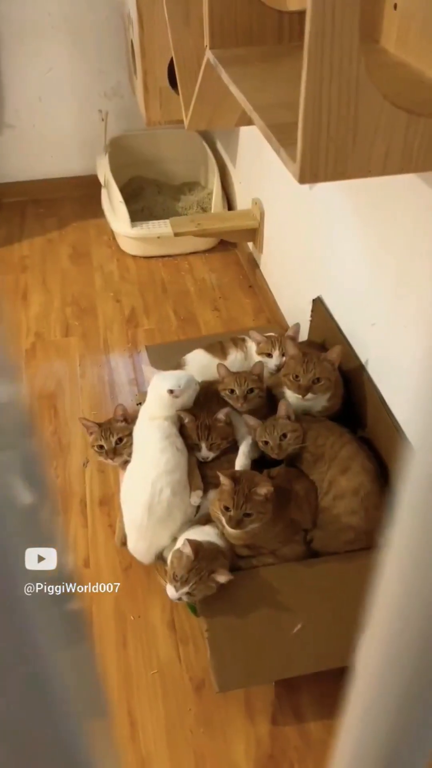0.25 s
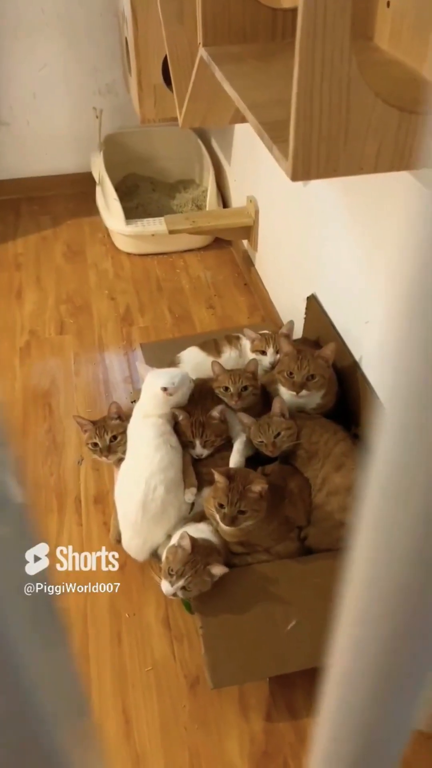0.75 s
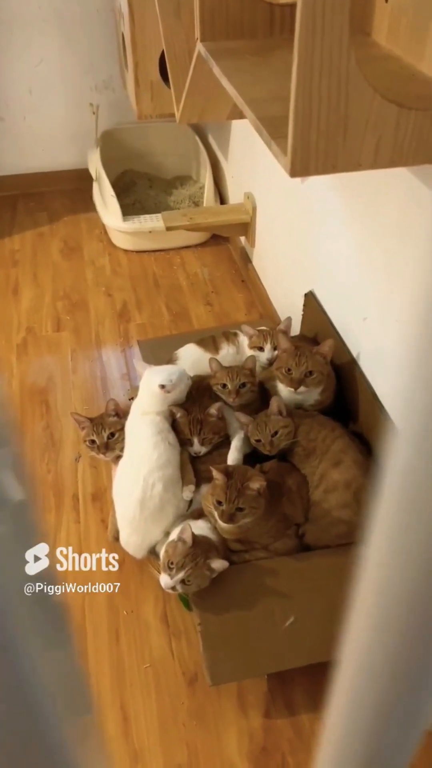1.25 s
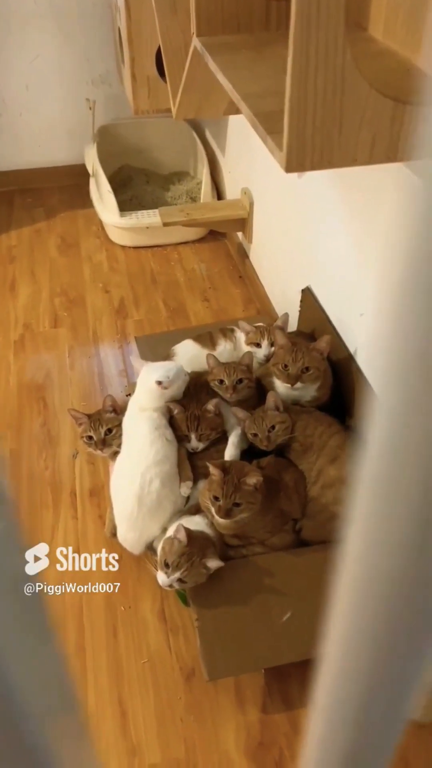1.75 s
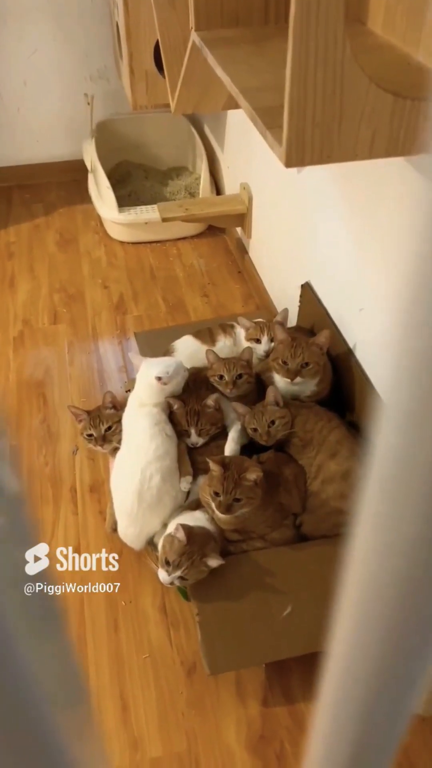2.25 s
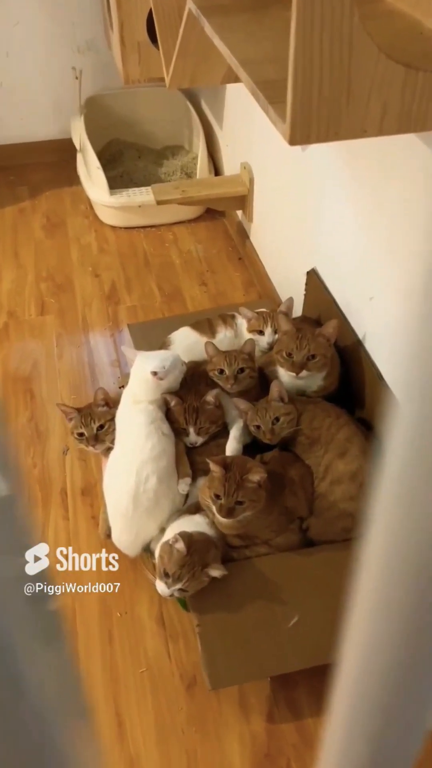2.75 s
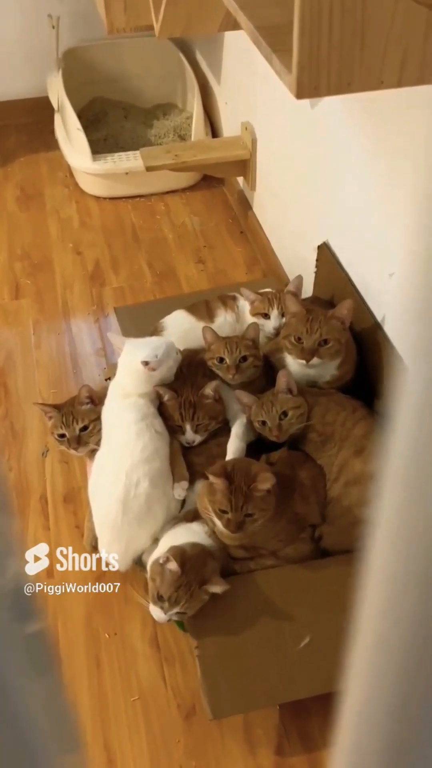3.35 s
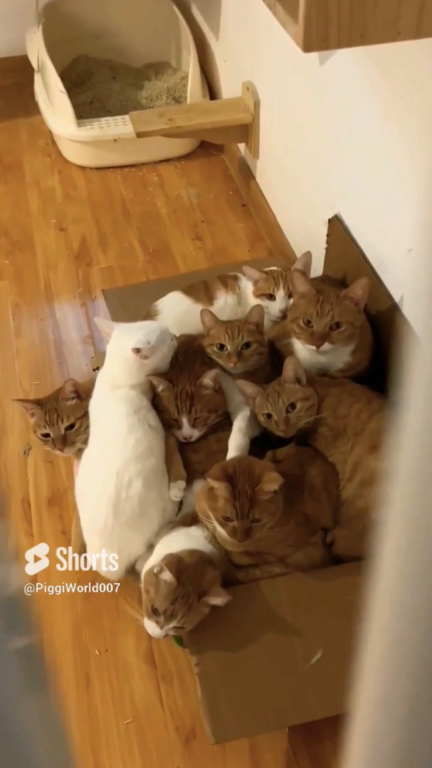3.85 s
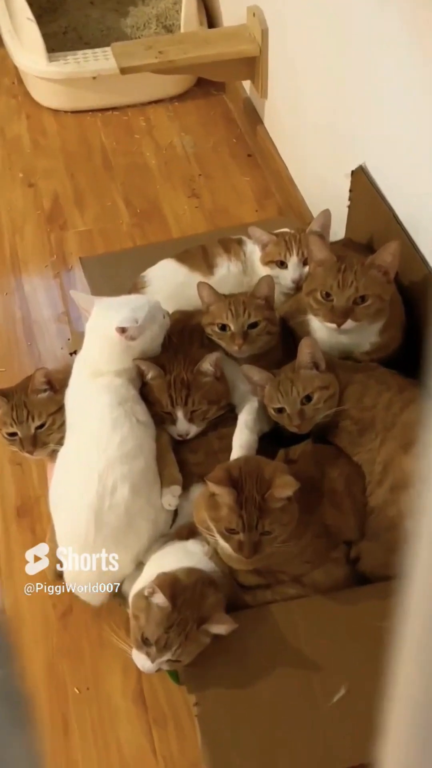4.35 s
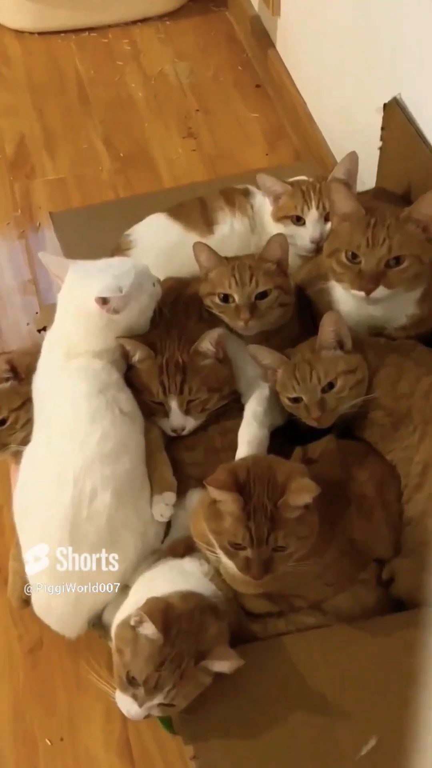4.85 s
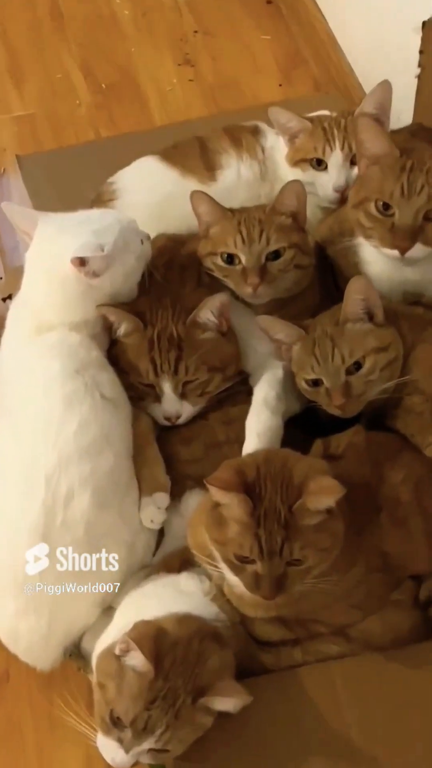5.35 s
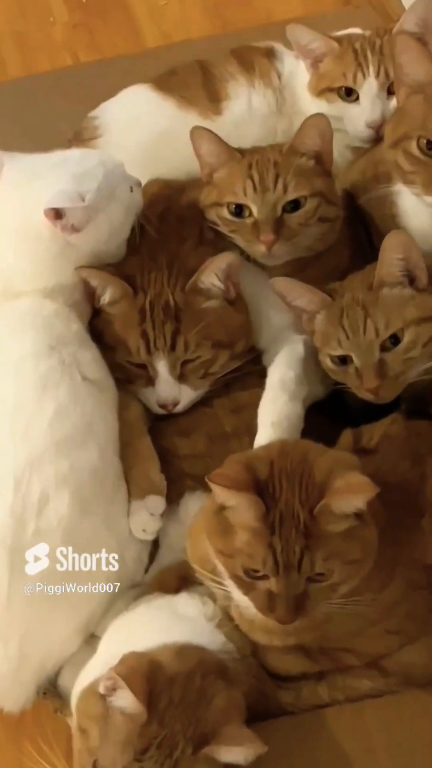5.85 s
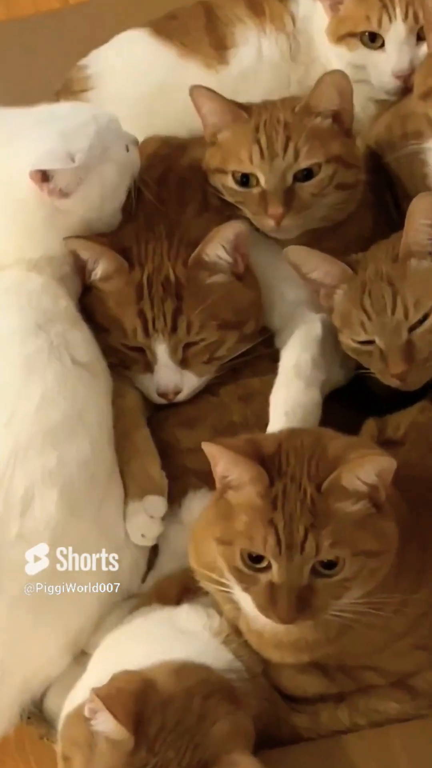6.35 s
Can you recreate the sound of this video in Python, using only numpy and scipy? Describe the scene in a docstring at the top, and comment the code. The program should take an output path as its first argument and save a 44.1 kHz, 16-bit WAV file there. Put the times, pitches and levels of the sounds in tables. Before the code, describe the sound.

Several cats purr together in a low, fluttering rumble in a small room, with two wooden knocks early on and faint rustling later.

```python
"""A small room with a wooden floor: a heap of cats purrs on a sheet of cardboard, in faint hiss and rumble.
Each cat's larynx snaps in pulses that thump the chest and flutter noise through the throat.
Two knocks on wood, a weak tap before them and a softer bump from further off ring wood and room modes.
Fur and cardboard rustle as noise broken into slips; a swish, a squeak and low drones are narrow noise.
The microphone loses the deepest bass and everything above its band limit."""
import sys
import numpy as np
from scipy import signal
from scipy.fft import rfft, irfft, next_fast_len
from scipy.io import wavfile
from scipy.ndimage import uniform_filter1d, map_coordinates

SR = 44100
rng = np.random.default_rng(int(sys.argv[2]) if len(sys.argv) > 2 else 0)


def put_to_file(sound):
    """Save the sound as 16-bit audio at rate SR, in the file named by the first command-line argument."""
    columns = np.atleast_2d(sound).T  # one column per channel
    safe = np.clip(columns, -1, 1)
    whole_steps = np.round(safe * 32767)
    wavfile.write(sys.argv[1], SR, whole_steps.astype(np.int16))


N = 291312
TIME = np.arange(N) / SR  # s

# Steady hiss of the room, spectrum shape: f/Hz, relative density/dB
AIR_SPECTRUM = [(20, 18.5), (60, 19.5), (200, 10.5), (600, 8.5), (1000, 5.5), (1500, -5), (3000, -4),
                (5000, -7.5), (7800, -7.5), (9800, -16.5), (11500, -13.5), (15500, -17.5)]
# Standing waves of the room: f/Hz, relative level/dB, t60/s
STANDING_WAVES = [(65.2, 3, 1.13), (94.5, -10.5, 1.6), (110.4, -12, 1.9), (237.4, -12.5, 0.76),
                  (331, -4.5, 0.8), (347, -9, 0.76), (363, -0.5, 0.55), (385, -15, 1.19),
                  (536, -20.5, 0.87), (600, -9.5, 0.35), (874, -22, 0.26), (1370, -29.5, 0.92),
                  (1394, -22, 0.35), (1545, -27.5, 0.5), (1675, -20, 0.43), (1706, -25.5, 0.36),
                  (2055, -26, 0.495), (2650, -37, 0.36)]
# Decay of the diffuse room tail: f/Hz, t60/s
ROOM_T60 = [(100, 1), (400, 0.4), (1000, 0.73), (1700, 0.55), (2500, 0.61), (5000, 0.21), (10000, 0.2)]
# Colour of the diffuse room tail: f/Hz, relative level/dB
ROOM_COLOUR = [(40, 3.5), (120, -3), (350, -14), (700, -17), (1100, 0), (1800, 3.5), (2550, 4.5),
               (2850, -4), (3100, -12), (3500, 0), (4500, -1), (8000, -12)]

# Brief low drones and a soft low puff: t/s, length/s, centre f/Hz, width/Hz, level/dB
DRONES = [(-.03, 0.16, 531, 9.3, -48.5), (-.03, 0.14, 377, 19, -47), (-.03, 0.11, 63, 4.8, -36.5),
          (0.061, 0.035, 244, 35, -35), (0.104, 0.54, 526, 12, -65), (2.205, 0.42, 65.5, 5.8, -41)]
# Bands of the light swish after the first hard knock: f/Hz, width/Hz, level before roughness/dB
SWISH_BANDS = [(800, 170, -56), (3530, 720, -62.5), (5930, 620, -71.5), (8800, 760, -69)]

# Fur sliding on cardboard, spectrum shape: f/Hz, relative density/dB
RUSTLE_SPECTRUM = [(200, -25), (600, -0.5), (1100, 0.5), (1600, -1), (2300, -4.5), (3200, -18.5),
                   (5000, -23), (7000, -31), (12000, -41)]
# Slides: middle t/s, length/s, relative level/dB, high hiss re slide/dB, light brushing re slide/dB
SLIDES = [(1.203, .06, -71.5, -14, 10), (2.515, 0.12, -70, -21, 0.5), (2.878, 0.11, -73.5, -23.5, -4),
          (3.192, 0.08, -67, -19, -9), (3.378, 0.075, -61, -26, 1), (3.926, 0.08, -70, -12, 5.5),
          (4.714, 0.17, -70, -21.5, -10), (5.055, 0.19, -66.5, -17, -5.5), (5.317, 0.071, -63.5, -25, -16),
          (5.524, 0.12, -64, -28, -15), (5.96, 0.19, -63, -15.5, -7.5), (6.19, 0.076, -53, -21.5, -7),
          (6.263, 0.068, -54.5, -14, -7), (6.43, 0.081, -63.5, -9, -15), (6.542, 0.056, -61, -5.5, -3)]

# Blows: t/s, direct level/dB, room level/dB, boom level/dB, relative wood ring/dB, contact cut-off f/Hz
KNOCKS = [(0.066, -36.5, -51, -55.5, 2, 1800), (0.357, -15, -23, -39.5, 1.5, 2800),
          (1.297, 1, -13, -22.5, 0, 6000), (2.204, -49, -21.5, -49, -28, 5000)]
# Ringing modes of the struck wood: f/Hz, relative level/dB, t60/s
WOOD_MODES = [(132, -3, 0.048), (220, -15.5, 0.11), (395.4, -16.5, 0.13), (487, -12, 0.053),
              (631, -15, 0.076), (697, -6.5, 0.028), (1071, -24.5, 0.05), (1393, -32.5, 0.12),
              (1600, -48, 0.13), (1725, -40, 0.18), (2030, -44, 0.17), (2540, -45.5, 0.15),
              (2825, -56, 0.31), (3370, -54.5, 0.26), (3485, -57.5, .24), (3720, -62, 0.285),
              (3820, -66, 0.24), (4400, -57, 0.098), (7500, -43.5, 0.03)]
# First thud of a blow, spectrum shape: f/Hz, relative level/dB
THUD_SPECTRUM = [(60, -34.5), (200, -7), (400, 3), (600, 4), (800, -1.5), (1100, -17), (1600, -24.5),
                 (2400, -27), (4000, -40.5), (6500, -43), (9000, -56), (15000, -75)]

# Chest resonance, spectrum shape: f/Hz, relative density/dB
CHEST_SPECTRUM = [(20, -42.5), (35, -8.5), (50, -4.5), (65, -7), (80, -8.5), (100, 2.5), (125, -0.5),
                  (155, 0.5), (180, 2), (240, -4), (265, -6.5), (320, -9), (385, -16.5), (460, -24),
                  (1500, -72.5)]
# Throat rasp, spectrum shape: f/Hz, relative density/dB
THROAT_SPECTRUM = [(200, -48), (400, -2), (500, 1.5), (900, 3.5), (1200, -13), (1800, -22), (3500, -36),
                   (8000, -48)]
# Bright edge of each puff, spectrum shape: f/Hz, relative density/dB
PUFF_SPECTRUM = [(300, -17), (700, 0.5), (1000, 2), (1350, 1), (1750, -7), (2500, -20), (6000, -46)]
# Purr strokes, each lasting until the next: start t/s, relative chest level/dB, upper chest lift/dB,
# relative rasp level/dB, lull in the rasp at the start/dB, lead of the nearest cat over the others/dB
STROKES = [(-.2, -43, -9, -58, -12.5, -3.5), (.22, -41, -5, -58, 4, -4.5), (.65, -41, 0.5, -56.5, 1, -2),
           (1.13, -42.5, 5.5, -58, 0, 2), (1.5, -46, 0.5, -59.5, -1, -2.5),
           (1.93, -41.5, 1.5, -58, 6, -3.5), (2.499, -50, 1, -64, 16, -13),
           (2.83, -44.5, -5.5, -60.5, 5.5, 0), (3.361, -43.5, 2, -58, -7.5, 0.5),
           (3.778, -48, 3, -60, 5.5, -3), (4.16, -46.5, 1, -61.5, 4, -3), (4.471, -49, 0.5, -62, 0, -5.5),
           (4.77, -44, 2.5, -61.5, 2, 0), (5.421, -45.5, 3.5, -58.5, -4, -1), (6.09, -44, 4, -58, 0.5, -3)]

MIC_TOP_HZ = 15500
RUMBLE_HZ, RUMBLE_WIDTH_HZ, RUMBLE_DB = 69.8, 8.4, -56
SWISH_S, SWISH_LENGTH_S, SWISH_ROUGH_DB = 0.366, 0.165, 3
SQUEAK_S, SQUEAK_LENGTH_S = 4.78, 0.33
SQUEAK_HZ, SQUEAK_WIDTH_HZ, SQUEAK_DB = 3690, 110, -76
FIDGET_DB = -75.5  # faint rubbing between the slides, on the relative scale of the slides
SLIDE_FADE_S = 0.037  # the room carries each slide on a little
HISS_HZ, HISS_WIDTH_HZ = 4170, 1300
BRUSH_HZ, BRUSH_WIDTH_HZ = 1930, 620
CHEST_ARCH_DB, RASP_ARCH_DB = 4.5, 2.5  # how far a stroke sags at both ends
TURN_S, LULL_S = 0.12, 0.074  # glide from stroke to stroke; half-width of the lull
PURR_HZ, PURR_HZ_PER_DB = 25.55, 0.16  # the nearest cat pulses faster as it purrs harder
QUICK_HZ, QUICK_DB = 29.88, -5  # a quicker-purring neighbour; level before the nearest cat's lead
UPPER_CHEST_HZ = 240
PUFF_DB, PUFF_RISE_S = -3.5, 0.0024  # puffs against the rasp, before the lead; rise time
CLICK_DB = 4  # the clean click in each puff, against its breathy part


def amp(db):
    """Decibels to gain."""
    return 10 ** (np.asarray(db) / 20)


def unit(x):
    """x at rms 1."""
    return x / np.sqrt(np.mean(x ** 2) + 1e-20)


def along(points, hz):
    """(f/Hz, value) points read on a log frequency axis."""
    f, value = np.transpose(points)
    return np.interp(np.log(hz + 1), np.log(f + 1), value)


def wobble(rate):
    """A smooth random curve, rate knots a second."""
    knots = rng.standard_normal(int(N * rate / SR) + 4)
    return map_coordinates(knots, [TIME * rate])


def filtered(x, response):
    """x times a response of frequency."""
    m = next_fast_len(N + SR)
    return irfft(rfft(x, m) * response(np.fft.rfftfreq(m, 1 / SR)), m)[:N]


def coloured(x, spectrum, size=8192):
    """x through a causal, minimum-phase body with this (f/Hz, level/dB) spectrum."""
    gain = amp(along(spectrum, np.fft.rfftfreq(size, 1 / SR)))
    cepstrum = irfft(np.log(gain + 1e-6))
    # folding the cepstrum forward in time makes the body answer only after it is driven
    cepstrum[1:size // 2] *= 2
    cepstrum[size // 2 + 1:] = 0
    return signal.fftconvolve(x, irfft(np.exp(rfft(cepstrum))))[:N]


def narrow(hz, width_hz):
    """Noise in one Gaussian band; the width is its standard deviation."""
    return filtered(rng.standard_normal(N), lambda f: np.exp(-.5 * ((f - hz) / width_hz) ** 2))


def swell(s, length, hz, width_hz, db):
    """Narrow noise that rises quickly and falls more slowly."""
    band = narrow(hz, width_hz)
    shape = np.sin(np.pi * np.sqrt(np.clip((TIME - s) / length, 0, 1))) ** 2
    loudness = np.sqrt(np.average(band ** 2, weights=shape ** 2 + 1e-12))
    return amp(db) * shape * band / loudness


def room_air():
    """The faint steady hiss of the room: coloured noise."""
    return amp(-65.0) * unit(coloured(rng.standard_normal(N), AIR_SPECTRUM))


def room_rumble():
    """A low standing wave of the room, never quite still: narrow noise."""
    return amp(RUMBLE_DB) * unit(narrow(RUMBLE_HZ, RUMBLE_WIDTH_HZ))


def room_tail():
    """A diffuse answer of the walls: noise that decays at its own rate in each band."""
    hz, t, bins = signal.stft(rng.standard_normal(SR), SR, nperseg=256)
    decay_db = 60 * t / along(ROOM_T60, hz)[:, None]
    gain = amp(along(ROOM_COLOUR, hz)[:, None] - decay_db)
    onset = 1 - np.exp(-t / 0.00099)
    tail = signal.istft(bins * gain * onset, SR, nperseg=256)[1]
    return tail / np.linalg.norm(tail)


def room_boom(t):
    """Standing waves at random phases, each building up over a few of its own cycles and dying away."""
    boom = np.zeros(len(t))
    for hz, db, t60 in STANDING_WAVES:
        build_up = 1 - np.exp(-t * hz / 6)
        boom += amp(db - 60 * t / t60) * build_up * np.sin(2 * np.pi * (hz * t + rng.random()))
    return boom


def drones():
    """A few brief low drones and a soft puff: swells of narrow noise."""
    return sum(swell(*drone) for drone in DRONES)


def squeak():
    """A faint thin squeak: one high, narrow swell of noise."""
    return swell(SQUEAK_S, SQUEAK_LENGTH_S, SQUEAK_HZ, SQUEAK_WIDTH_HZ, SQUEAK_DB)


def swish():
    """A light swish: several bands of noise swell together with one shared roughness."""
    bands = sum(swell(SWISH_S, SWISH_LENGTH_S, *band) for band in SWISH_BANDS)
    return amp(SWISH_ROUGH_DB * wobble(141.5)) * bands


def rustling():
    """Fur and cardboard slide in tiny slips that swell and fade, with brushing and high hiss."""
    power = np.array([amp(db) ** 2 * np.exp(-np.pi * ((TIME - s) / length) ** 2)
                      for s, length, db, *_ in SLIDES])
    hiss_db, brush_db = np.transpose(SLIDES)[3:]
    hiss_power = amp(hiss_db) ** 2 @ power  # the room does not hold the treble
    step = 1 / (SLIDE_FADE_S * SR)
    power = signal.lfilter([step], [1, step - 1], power + 1e-20)
    rub_power = amp(FIDGET_DB) ** 2 + power.sum(axis=0)
    brush_power = amp(brush_db) ** 2 @ power

    slips = amp(1.4 * wobble(120)) * rng.standard_normal(N)
    rub = amp(2.5) * np.sqrt(rub_power) * unit(coloured(slips, RUSTLE_SPECTRUM))
    brush = np.sqrt(brush_power) * unit(narrow(BRUSH_HZ, BRUSH_WIDTH_HZ))
    hiss = np.sqrt(hiss_power) * unit(narrow(HISS_HZ, HISS_WIDTH_HZ))
    return rub + brush + hiss


def knocks():
    """Each blow thuds and rings the wood, then fills the room and its standing waves."""
    out, t = np.zeros(N + 2 * SR), TIME[:SR]
    thud = -coloured(np.ones(1), THUD_SPECTRUM)
    thud = amp(-0.5) * np.pad(thud, (0, SR - len(thud))) / np.abs(thud).max()
    ring = sum(amp(db - 60 * t / t60) * np.sin(2 * np.pi * hz * t) for hz, db, t60 in WOOD_MODES)
    ring *= np.exp(-(t / 0.0039) ** 2) - 1  # inverted; the wood takes a moment to start ringing
    for s, direct_db, room_db, boom_db, ring_db, contact_hz in KNOCKS:
        boom = room_boom(t)
        echo = signal.fftconvolve(thud + amp(ring_db - 9.5) * ring, room_tail())[:SR]
        direct = thud + amp(ring_db) * ring
        blow = amp(direct_db) * direct + amp(room_db) * echo + amp(boom_db) * boom
        soft_contact = signal.butter(2, contact_hz, fs=SR)  # a lower cut-off dulls the blow
        out[round(s * SR):][:SR] += signal.lfilter(*soft_contact, blow)
    return out[:N]


def effort():
    """Purr levels in dB over time: each stroke arches, and the rasp shifts as the airflow turns."""
    start, chest_db, lift_db, rasp_db, lull_db, lead_db = np.transpose(STROKES)
    place = np.interp(TIME, np.append(start, N / SR), np.arange(len(start) + 1))
    stroke = np.minimum(place.astype(int), len(start) - 1)
    sag = 1 - np.sin(np.pi * (place - stroke))
    # a positive lull dips the rasp, a negative one lifts it
    lull = sum(db * np.exp(-((TIME - s) / LULL_S) ** 2) for s, db in zip(start, lull_db))

    def glide(db):
        """Moving average that joins one stroke to the next."""
        return uniform_filter1d(db, int(TURN_S * SR))

    chest = glide(chest_db[stroke] - CHEST_ARCH_DB * sag)
    rasp = glide(rasp_db[stroke] - RASP_ARCH_DB * sag) - lull
    return chest, glide(lift_db[stroke]), rasp, glide(lead_db[stroke])


def larynx(rate, jitter, scatter_db, reopen):
    """Two trains of uneven snaps: the vocal folds shutting, and opening again later in the cycle."""
    cycles = np.cumsum(rate) / SR + rng.random()
    shut = np.arange(1, int(cycles[-1]) + 1)
    chance = rng.standard_normal((256, 4))[:len(shut)]
    snaps = np.zeros((2, N + 1))
    for k, phase in enumerate([0, reopen]):
        at = np.searchsorted(cycles, shut + phase + jitter * chance[:, k])
        snaps[k, at] = amp(scatter_db * chance[:, k + 2])
    return snaps[:, :N]


def purring():
    """Three cats at their own rates: each snap thumps the chest and lets a puff through the throat."""
    chest_db, lift_db, rasp_db, lead_db = effort()
    rate = PURR_HZ + PURR_HZ_PER_DB * (chest_db - chest_db.mean()) + .4 * wobble(3)
    quick_rate = QUICK_HZ + 0.709 * wobble(2)
    slow_rate = 24.3 + 0.446 * wobble(2)
    shut, reopen = larynx(rate, jitter=.014, scatter_db=1.8, reopen=.36)
    quick = larynx(quick_rate, jitter=.012, scatter_db=2, reopen=.5)
    slow = larynx(slow_rate, jitter=0.026, scatter_db=0.0, reopen=0.402)
    snaps = amp(lead_db) * (shut + amp(-3) * reopen)
    snaps += amp(QUICK_DB + 0.83 * wobble(2.098)) * (quick[0] + amp(-7.0) * quick[1])
    snaps += amp(-0.5) * (slow[0] + amp(-3.5) * slow[1])
    snaps /= np.hypot(1, amp(lead_db))  # the lead changes the balance, not the loudness

    # the chests thump directly and by way of the walls
    t = TIME[:SR // 4]
    walls = rng.standard_normal(len(t)) * amp(-60 * t / 0.37)
    reflected = signal.fftconvolve(snaps, walls / np.linalg.norm(walls))[:N]
    heard = snaps + amp(-5) * reflected
    chest = unit(coloured(-heard, CHEST_SPECTRUM))
    upper = filtered(chest, lambda hz: hz ** 4 / (hz ** 4 + UPPER_CHEST_HZ ** 4))
    chest = chest + (amp(lift_db) - 1) * upper

    # the throats together make a soft fluttering rasp
    flow = unit(signal.fftconvolve(snaps, t * np.exp(-t / .004))[:N])
    rasp = unit(coloured((flow + .45) * rng.standard_normal(N), THROAT_SPECTRUM))

    # only the nearest cat's puffs keep their edge through the fur; the powers even out the snaps
    edge = unit(signal.fftconvolve(shut ** .25, t * np.exp(-t / PUFF_RISE_S))[:N])
    puff = edge * rng.standard_normal(N) + amp(CLICK_DB) * unit(shut ** .5)
    puffs = amp(PUFF_DB + lead_db) * unit(coloured(puff, PUFF_SPECTRUM))
    return amp(chest_db + 0.9) * chest + amp(rasp_db - 4.0) * (rasp + puffs)


def scene():
    """The sounds summed, from the background of the room to the purring heap."""
    background = room_air() + room_rumble()
    small_sounds = drones() + squeak() + swish()
    return (background + small_sounds + rustling() + knocks() + purring())[None]


def record(dry):
    """The microphone sheds the deepest bass and keeps nothing above its band limit."""
    bass_cut = signal.butter(2, 38, "highpass", fs=SR, output="sos")
    thin = signal.sosfilt(bass_cut, dry[0])
    return filtered(thin, lambda hz: hz < MIC_TOP_HZ)[None]


dry = scene()
out = record(dry)
put_to_file(out)
```